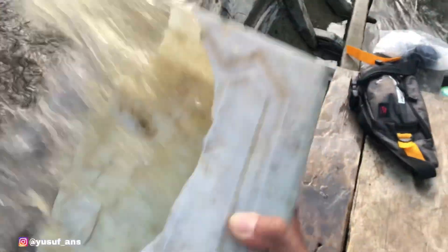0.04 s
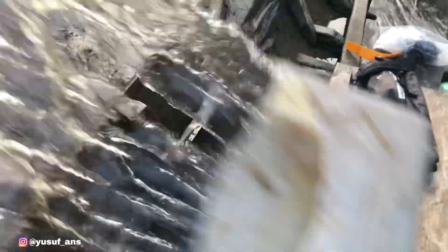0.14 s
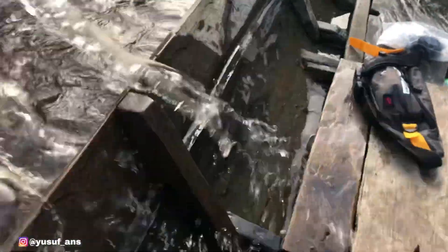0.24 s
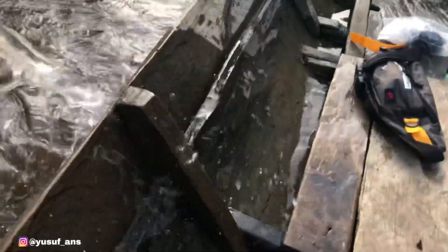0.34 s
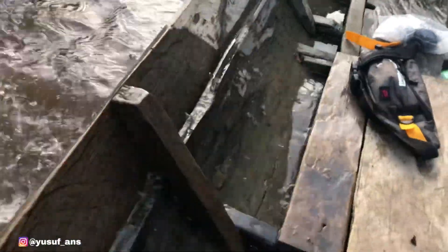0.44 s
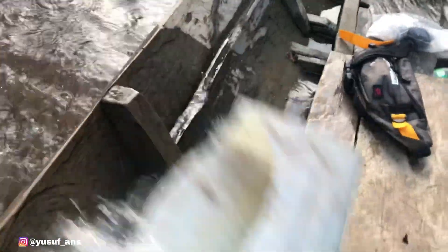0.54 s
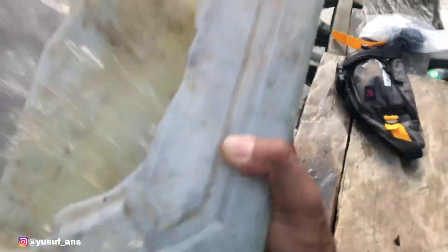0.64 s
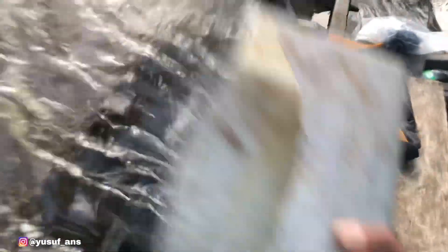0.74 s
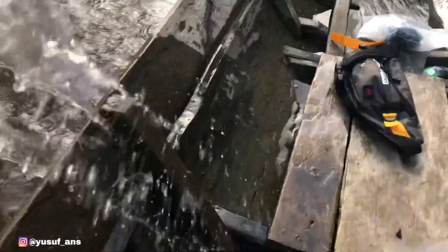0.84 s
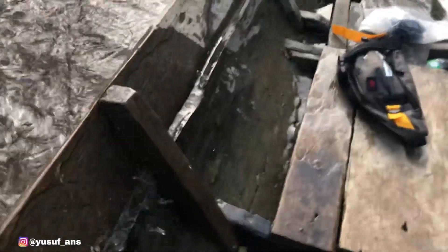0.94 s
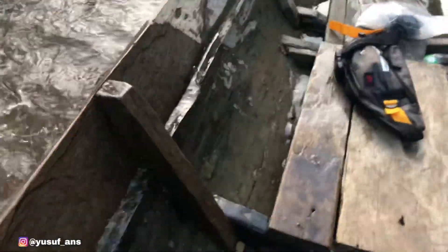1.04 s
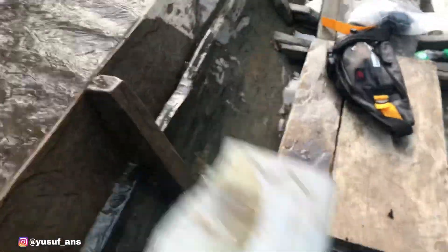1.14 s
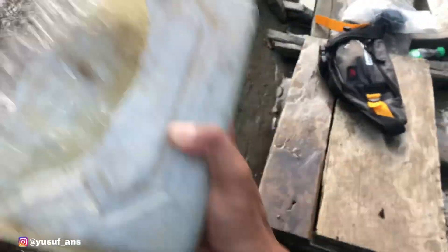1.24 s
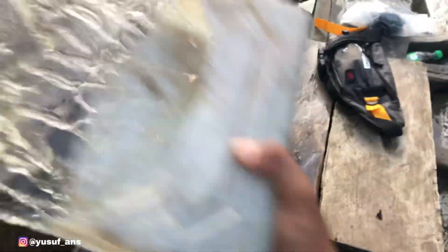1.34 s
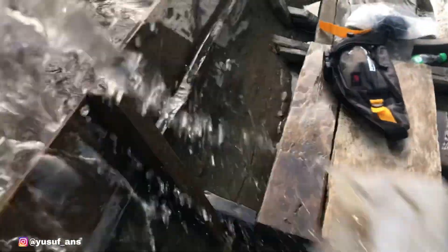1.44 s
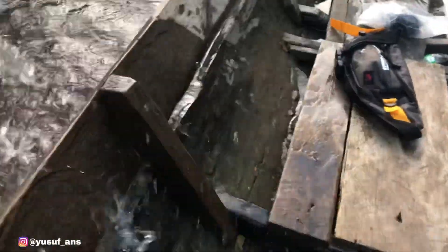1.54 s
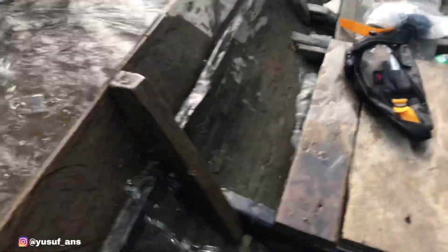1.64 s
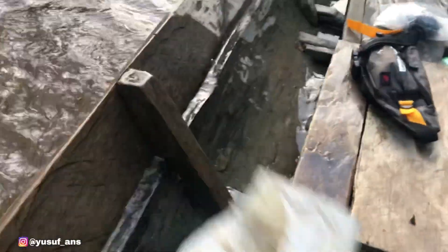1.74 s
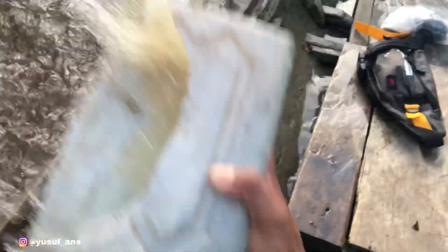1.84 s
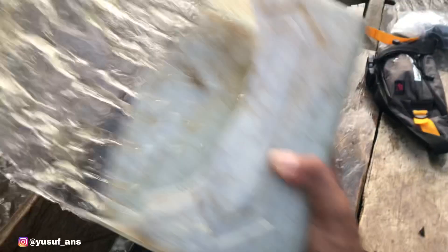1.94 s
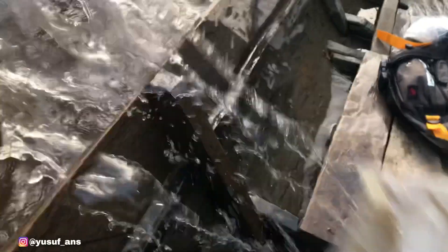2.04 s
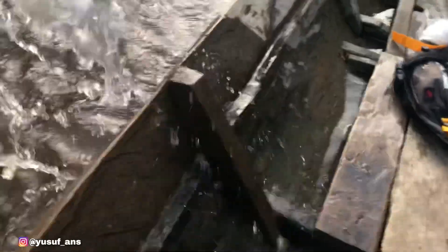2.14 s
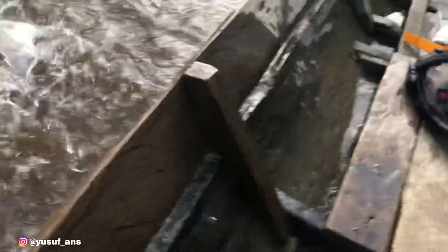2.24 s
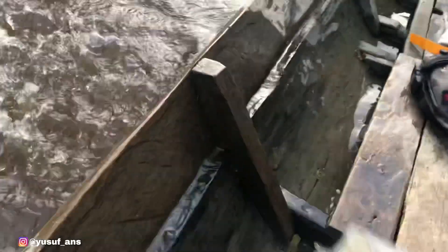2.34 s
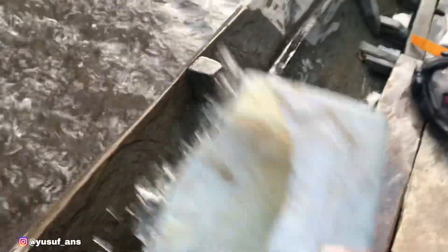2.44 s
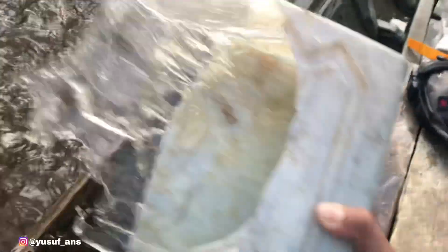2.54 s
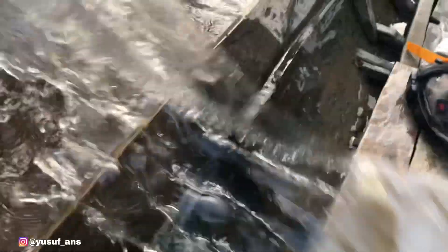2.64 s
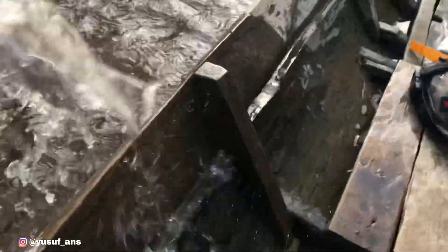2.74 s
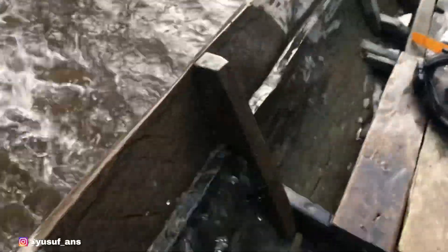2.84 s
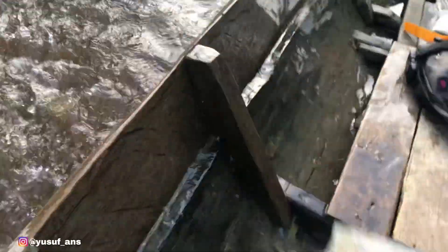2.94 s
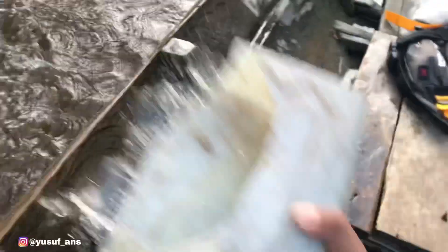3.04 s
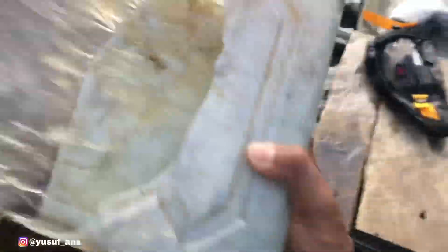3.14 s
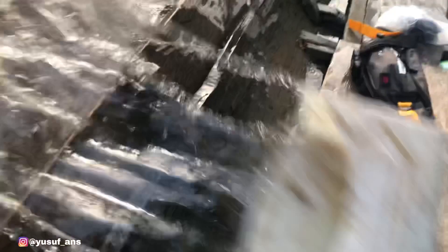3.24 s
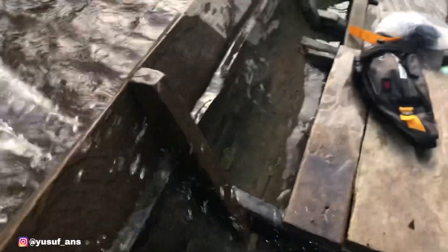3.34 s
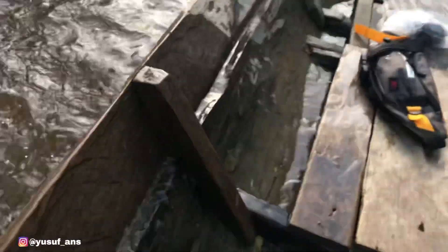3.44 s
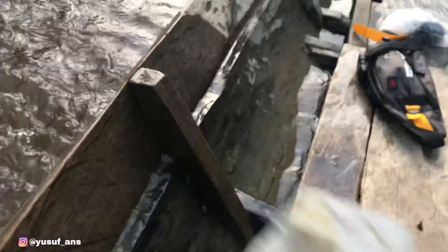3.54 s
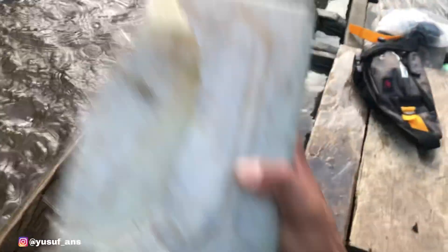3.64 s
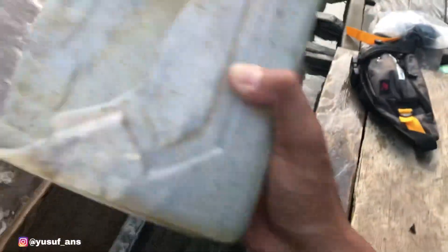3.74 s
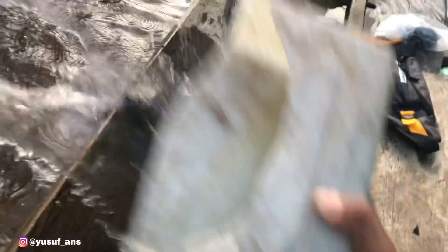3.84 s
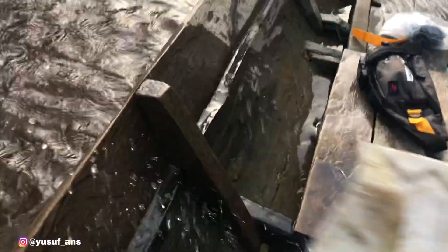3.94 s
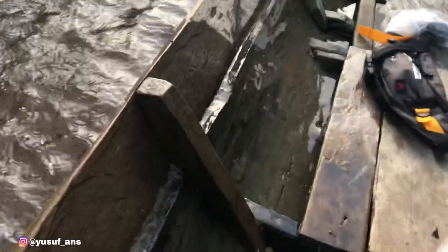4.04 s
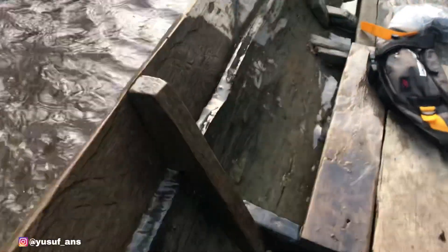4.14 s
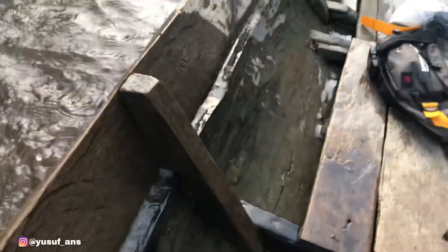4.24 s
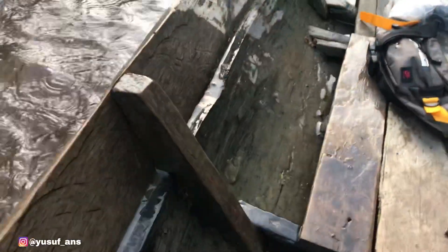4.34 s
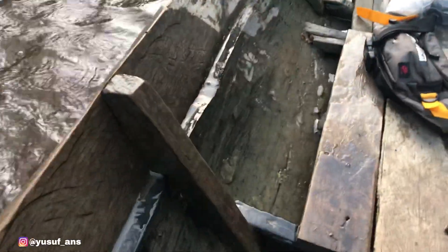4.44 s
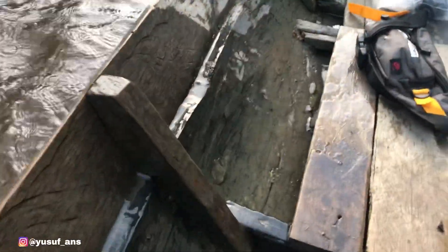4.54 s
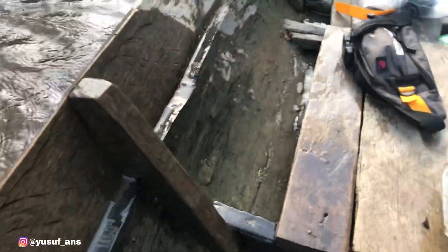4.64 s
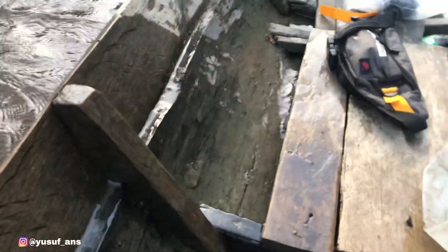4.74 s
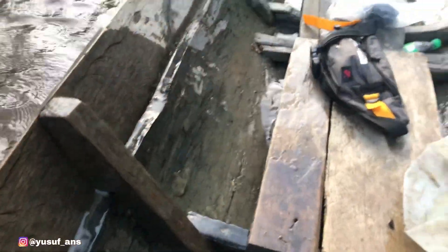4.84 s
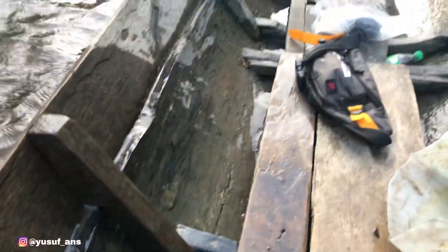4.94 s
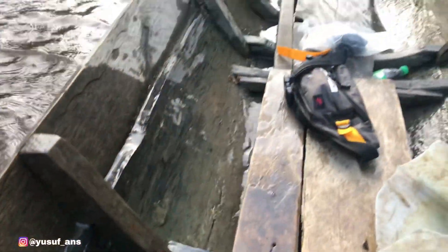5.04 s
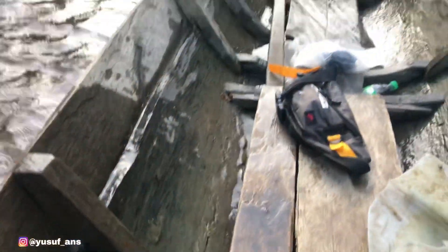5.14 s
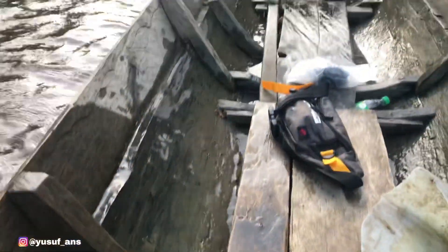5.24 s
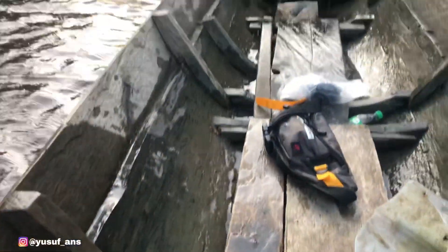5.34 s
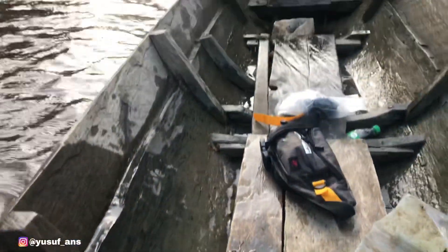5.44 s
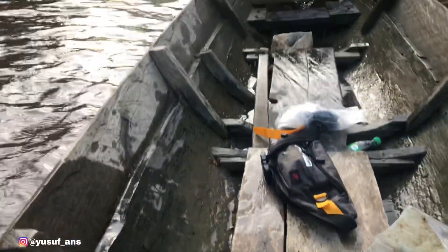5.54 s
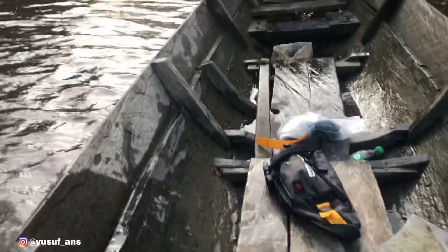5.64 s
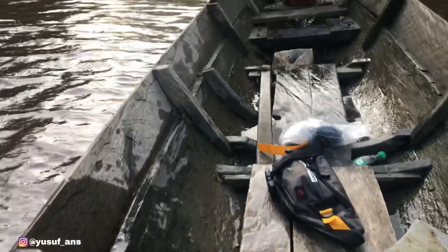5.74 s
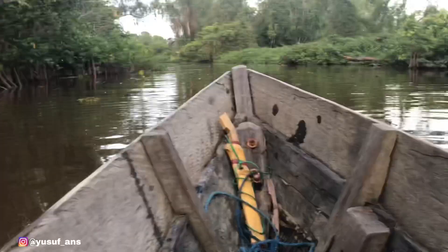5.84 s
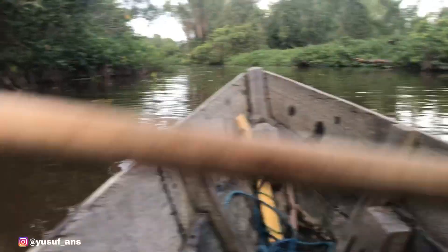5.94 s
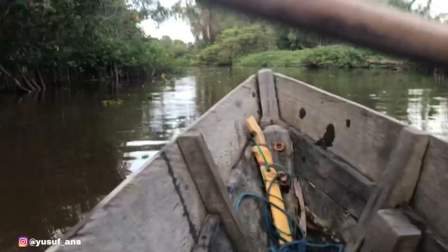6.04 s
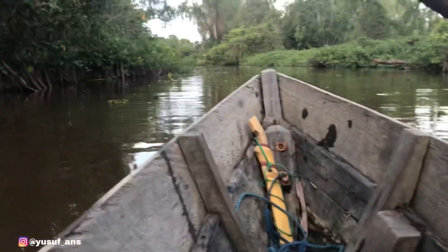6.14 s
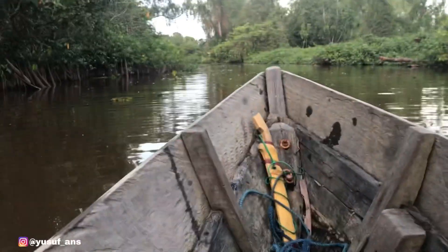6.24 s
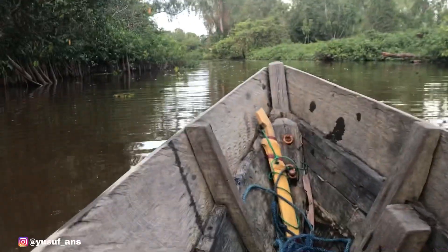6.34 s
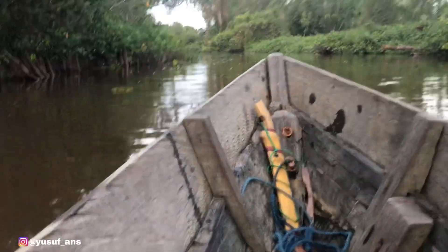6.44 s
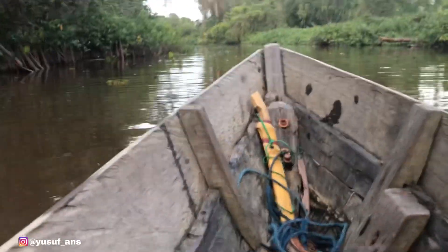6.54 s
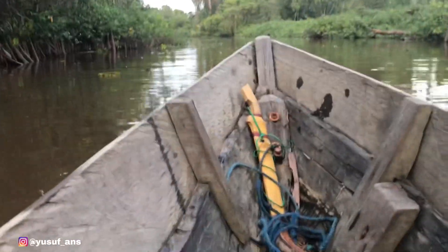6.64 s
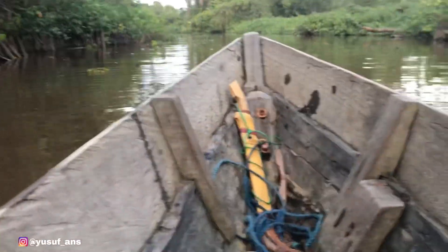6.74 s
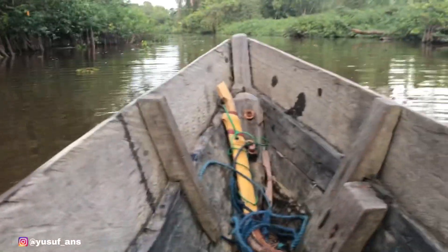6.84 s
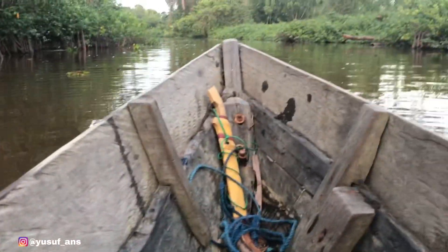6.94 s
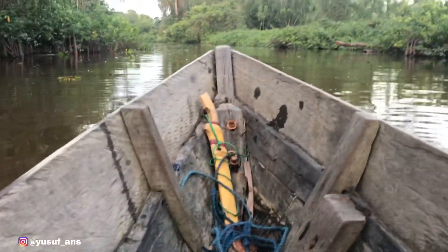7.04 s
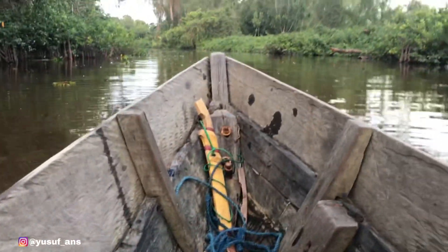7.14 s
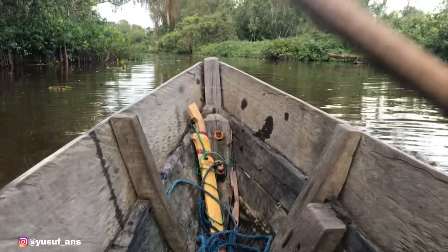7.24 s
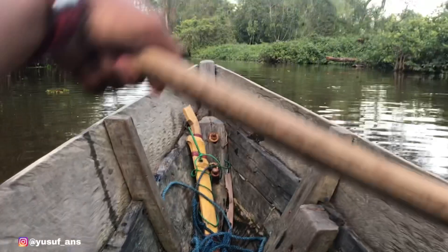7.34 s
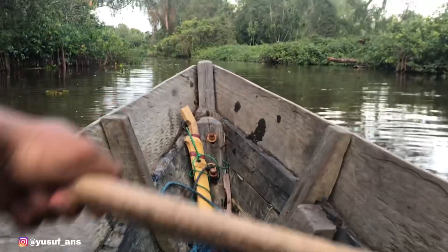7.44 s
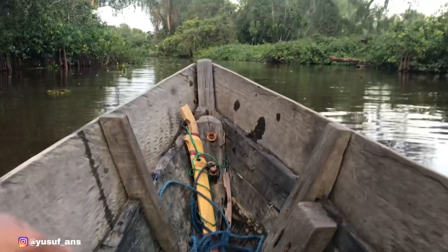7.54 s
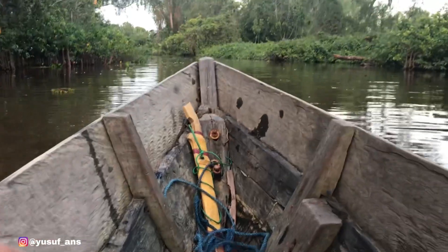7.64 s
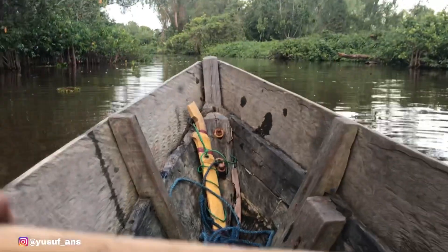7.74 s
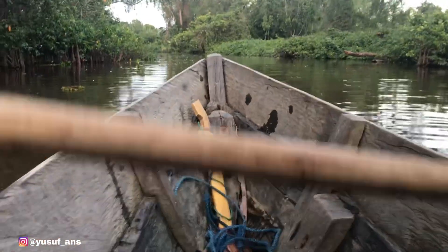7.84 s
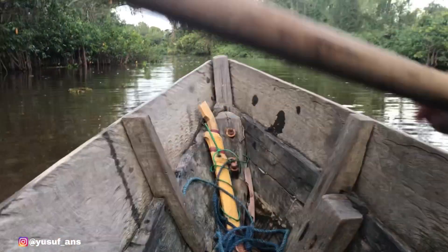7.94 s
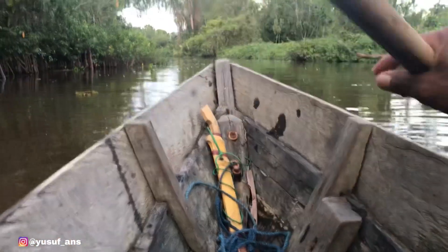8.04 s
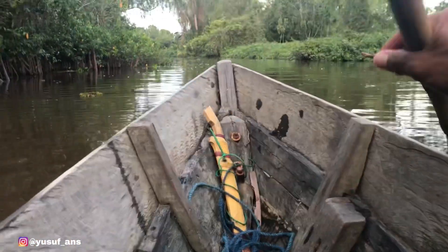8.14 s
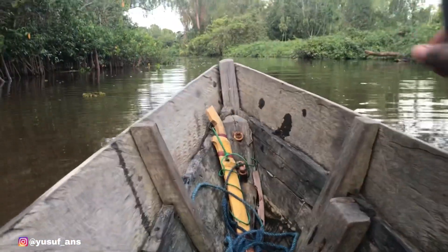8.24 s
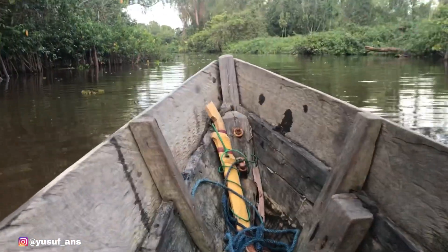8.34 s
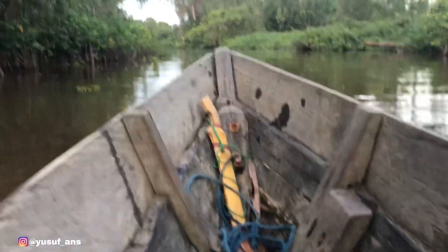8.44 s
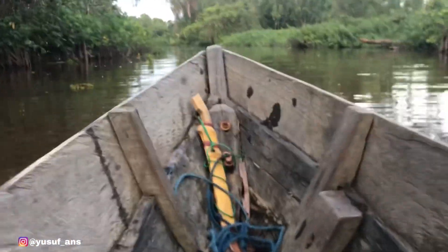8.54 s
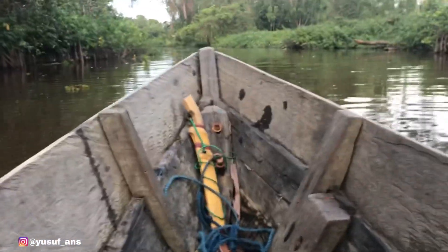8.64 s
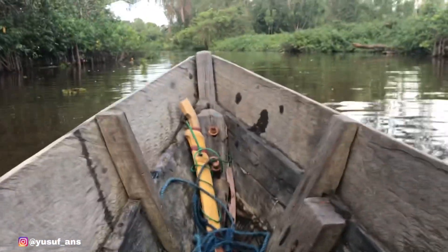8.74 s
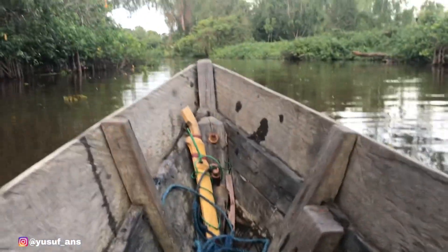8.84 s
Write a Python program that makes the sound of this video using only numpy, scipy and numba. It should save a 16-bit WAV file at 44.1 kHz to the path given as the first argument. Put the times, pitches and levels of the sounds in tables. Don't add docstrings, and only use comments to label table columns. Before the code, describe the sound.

Water splashes at once as bailing is already under way. At about 0.3, 0.9, 1.5, 2.2, 2.8 and 3.4 seconds a hard plastic scoop rasps over wooden planks, very loud and close, hollow and gritty with sharp snags, sometimes as a double scrape. After each comes a rush of spray, froth and slosh, with crackling drops and round bubble plops. The last stream thins to drips near 4.1. At 4.2 the empty scoop falls, knocks, slides and rattles to rest by 4.7, while a bird whistles upward. A small gust stirs leaves near 5. A distant engine thumps dully, with thin high insects. At 5.8 the ambience switches abruptly to the open river. From 6.4 a paddle bumps the hull, with soft wash, gulps around 7 to 7.3, flicked drops and faint chirps. More dull knocks and another pull follow from 8.1 to the end, much quieter than the bailing.

```python
import sys
import numpy as np
from scipy import signal
from scipy.fft import rfft, irfft, next_fast_len
from scipy.io import wavfile
from scipy.ndimage import uniform_filter1d, map_coordinates
from numba import njit

SR = 44100
rng = np.random.default_rng(int(sys.argv[2]) if len(sys.argv) > 2 else 0)


def generate_wav(sig):
    pcm = np.round(np.clip(np.atleast_2d(sig).T, -1, 1) * 32767).astype(np.int16)
    wavfile.write(sys.argv[1], SR, pcm)


def voltage_ratio(level):
    return 10 ** (np.asarray(level, float) / 20)


N = 391608
T = np.arange(N) / SR
BAILING, PADDLING = (0, 4.35), (6.45, 8.88)  # (start [s], end [s])
CHANGE_S = 5.8
TOP_HZ = 15850

# (start [s], end [s], start level [dB], end level [dB], mouth ring [dB])
SCRAPES = [(0.259, 0.309, -9.5, -3.5, -9), (0.361, 0.409, -4.5, -3, -0.5), (0.877, 1.003, -21, -11.5, 4),
           (0.999, 1.021, -2.5, -16.5, 8), (1.514, 1.559, -20.5, -12, 10), (1.56, 1.624, -13, -10.5, 4),
           (2.118, 2.145, 3, -8, -9), (2.179, 2.216, -18, -10, -8.5), (2.224, 2.24, 1, -5.5, -12.5),
           (2.742, 2.778, -1, -8, -5.5), (2.824, 2.875, -6.5, -3.5, -15.5), (3.36, 3.39, -6, -11.5, -12)]
DRAG_TUNING = [0.9, 0.57, -1.2, 0.8, 0.5, 0.2, 1.34, -0.6, 1.3, -.6, 0.02, 2.5]
# (frequency [Hz], width [Hz], level
# [dB])
SCOOP_MODES = [(81, 26, -15.5), (157, 49, -11.5), (264.4, 33, -4.5), (332.2, 26, 1), (455.3, 71, 0.5),
               (551.4, 51, 0), (644, 69, -2), (753, 60, -6.5)]
# (frequency [Hz], width [Hz], level [dB])
MOUTH_MODES = [(954, 74, 0), (1060, 100, -7.5), (1270, 66, -14.5), (1450, 48, -13.5), (1628, 120, -13),
               (2100, 115, -15), (2730, 140, -19.5), (3280, 100, -21), (3580, 100, -17), (3980, 120, -22.5)]
# (frequency [Hz], density [dB per Hz])
GRIT_COLOUR = [(650, -27.5), (1100, -2), (2510, -8), (3140, -4), (4960, -13.5), (7400, -21), (9250, -21),
               (15800, -28.5)]
# (time [s], peak level [dB])
CATCHES = [(0.259, 8.5), (0.274, -4), (0.301, -1.5), (0.362, -1), (0.373, 2), (0.396, 2.5), (0.878, -0.5),
           (0.908, -3.5), (0.95, -9), (0.971, -5), (0.993, 3), (1.014, -5), (1.503, 2.5), (1.529, -3),
           (1.546, -5), (1.565, -5), (1.588, 0.5), (1.617, -2), (2.118, 7.5), (2.14, 7), (2.183, -5),
           (2.207, -1), (2.226, 2.5), (2.247, 4.5), (2.745, -2), (2.762, 2.5), (2.829, 0), (2.849, 2.5),
           (2.864, 14), (3.36, 3.5), (3.375, -9.5), (3.387, -4)]
# (start [s], end [s], start level [dB], end level [dB])
SLIDES = [
    (4.245, 4.379, -28.5, -13.5),
    (4.374, 4.51, -24, -19),
    (4.499, 4.68, -19, -40),
]
# (time [s], peak level [dB], click level [dB], shift [semitones])
TUMBLE = [(4.237, -21.5, -7.5, .3), (4.242, -6, -21, -0.88), (4.285, -20, -20, .3),
          (4.362, -7.5, -17.5, -0.13), (4.401, -18, -4.5, 0.16), (4.414, -16.5, -5, .3),
          (4.441, -15.5, -10, .3), (4.462, -15.5, -3.5, .3), (4.477, -14.5, -14.5, 0.2),
          (4.487, -8, -16, 0.75), (4.521, -24.5, -9.5, 0.45), (4.531, -13, -15.5, 0.41),
          (4.583, -24.5, -16.5, .6), (4.639, -27.5, -13.5, 0.45)]
# (frequency [Hz], width [Hz], level [dB])
EMPTY_MODES = [(181, 32, -9), (273, 27, -4.5), (339.7, 55, -1.5), (457, 48, -6.5), (622, 55, -8),
               (776, 90, -12), (960, 38, -1), (1060, 95, -6), (1340, 170, -13), (1626, 100, -13),
               (2030, 140, -19.5), (2900, 300, -26.5)]

# (peak time [s], level [dB], rise [s], hold [s])
GUSHES = [(0, -34.5, .05, .04), (.235, -42.5, .03, .02), (.26, -33.5, 0.035, .1), (.44, -30.5, 0.19, .05),
          (.62, -33, 0.45, 0.05), (.84, -41, .02, .03), (1.05, -32, 0.4, 0.11), (1.27, -32.5, 0.24, .01),
          (1.42, -44.5, .05, .06), (1.66, -28.5, 0.38, 0.19), (1.9, -39.5, 0.14, .05), (2.3, -31, 0.41, .2),
          (2.63, -46, 0.068, .1), (2.91, -30.5, 0.48, .03), (3.02, -42, .1, .13), (3.41, -31, 0.068, 0.082),
          (3.6, -31.5, .3, 0.048)]
# (peak time [s], level [dB], rise [s], hold [s])
TRICKLE = [
    (4.063, -38, 0.044, .14),
]
# (frequency [Hz], density [dB per Hz])
SPRAY_COLOUR = [(880, -34), (1500, -7.5), (1810, 1), (2870, -6), (4520, -2), (7620, -9.5), (9470, -5.5),
                (14900, -9), (15800, -13)]
# (frequency [Hz], density [dB per Hz])
FROTH_COLOUR = [(500, -27), (850, 0), (1100, 3.5), (2200, -10.5), (3500, -11.5)]
# (frequency [Hz], density [dB per Hz])
SLOSH_COLOUR = [(150, -12.5), (250, -2), (450, -3), (700, -9.5), (1000, -15)]
# (time [s], peak level [dB], pitch [Hz])
BAIL_DROPS = [(0.0145, -12, 4700), (.064, -21, 4100), (.078, -18, 3700), (.174, -26.5, 11000),
              (0.1827, -12.5, 9200), (0.234, -17.5, 3700), (0.519, -12, 2600), (0.6193, -7.5, 2500),
              (0.829, -18.5, 3820), (0.994, 0, 3100), (1.2717, -13, 3720), (1.448, -18, 3450),
              (1.8346, -6, 4030), (1.9211, -15.5, 2610), (2.085, -15.5, 3700), (2.2885, -8, 3800),
              (2.379, -14, 3940), (2.46, -15.5, 4500), (2.6772, -17, 4300), (2.687, -18, 4300),
              (2.645, -21.5, 3320), (3.495, -12.5, 4500), (3.462, -18, 4000), (.792, -28.5, 4690),
              (.861, -23.5, 5000), (1.151, -17, 4420), (3.577, -15, 5200), (2.864, -2.5, 2960),
              (3.135, -13, 4280), (3.1936, -19.5, 3600), (3.311, -18.5, 3980), (3.6301, -15.5, 2900)]
# (time [s], peak level [dB], pitch [Hz])
DRIPS = [(3.787, -24.5, 3300), (3.874, -29, 4230), (3.886, -23, 2500), (3.979, -20.5, 7400),
         (3.99, -20.5, 2900), (4.0435, -24, 4570), (4.0801, -12, 3820), (4.1112, -15, 8650),
         (4.15, -18, 4300), (4.7888, -36.5, 8290), (5.0395, -32.5, 8400), (5.4343, -33, 8030),
         (5.472, -40.5, 2600), (5.729, -47, 2500), (6.5985, -31.5, 5610), (7.268, -37, 8090),
         (7.646, -31.5, 5140), (8.1753, -41.5, 4000), (8.488, -28.5, 4220), (8.8422, -35.5, 3640)]
# (time [s], peak level [dB], pitch [Hz])
PLANK_SPITS = [(0.4299, -13.5, 3630), (0.4843, -15, 5900), (0.5621, -10.5, 3970), (0.61, -14, 4040),
               (0.6694, -24, 3880), (0.7148, -20, 4300), (0.7774, -31.5, 3360), (0.8096, -22, 8580),
               (0.8444, -16, 6130), (1.035, -14, 8550), (1.0774, -17.5, 4490), (1.0969, -10.5, 3070),
               (1.1423, -15.5, 4280), (1.2999, -12.5, 4240), (1.3962, -21.5, 3070), (1.7255, -15, 3080),
               (1.7964, -18.5, 3080), (1.8284, -10.5, 3760), (1.8514, -15.5, 10900), (1.8664, -19, 3700),
               (1.8946, -18.5, 5720), (1.9334, -23.5, 4070), (2.0148, -22, 3390), (2.0344, -25.5, 9660),
               (2.0398, -16.5, 11830), (2.0544, -23, 5800), (2.0612, -21.5, 6600), (2.0724, -10, 9600),
               (2.2558, -5.5, 3990), (2.4404, -16.5, 4540), (2.613, -13, 6490), (2.6964, -19, 13520),
               (2.7334, -10, 3144), (2.8055, -6.5, 4450), (2.9118, -14.5, 3030), (3.3353, -16, 3490),
               (3.4077, -3.5, 4450), (3.6566, -14, 6110)]
# (time [s], peak level [dB], pitch [Hz])
BLADE_FLICKS = [(7.2541, -40, 3220), (7.2671, -36, 8090), (7.3155, -43, 8130), (7.3513, -37, 8250),
                (7.4038, -40, 8100), (7.4733, -38, 8140), (7.516, -34, 8030), (7.5978, -40, 3720),
                (7.6203, -37, 3030), (7.6458, -35, 5180), (7.6901, -31, 8490), (7.719, -39, 8060),
                (7.748, -39, 8080), (7.7924, -43, 8110)]
# (time [s], peak level [dB], pitch [Hz])
PLOPS = [(0.042, -23, 810), (0.061, -9.5, 872), (0.469, -16, 840), (0.517, -13, 2030), (0.539, -18, 554),
         (0.638, -15, 1056), (0.695, -14.5, 1730), (1.245, -13, 2160), (1.274, 11.5, 1730),
         (1.686, -14, 1060), (1.762, -8, 673), (1.829, -14.5, 1060), (1.893, -13.5, 930),
         (1.905, -17.5, 1600), (1.922, -14, 2670), (2.42, -15.5, 1790), (2.471, -18, 1170),
         (3.483, -13.5, 2190), (3.793, -25.5, 990), (4.182, -23.5, 1980), (4.199, -27, 1470),
         (5.365, -43, 1426), (5.472, -38, 1450), (5.883, -45.5, 1205), (7.244, -26, 710), (7.284, -14, 627),
         (7.328, -32, 537),
         (.402, -3, 1600), (.437, -17, 1650), (.483, -19, 1900), (1.634, -14, 2100), (1.657, -18, 1680),
         (2.024, -27, 1780), (2.339, -28, 1050), (2.52, -21, 1250), (2.604, -24.5, 1900), (.579, -24, 1300),
         (2.872, -4, 1600), (2.982, -17, 1790), (3.017, -27, 1100), (3.093, -20.5, 2130),
         (3.458, -20, 1410), (3.488, -18, 1050), (3.527, -17, 1750), (3.597, -15.5, 2150), (3.61, -18, 965),
         (7.243, -39, 1800), (7.254, -41, 3100), (7.328, -33, 1080), (7.013, -38, 850), (7.045, -36, 1400),
         (7.485, -31, 1000), (7.75, -40, 1910)]
# (time [s], pitch [Hz], level [dB])
RISING = [
    [(3.172, 1124, -37), (3.2, 1450, -39), (3.215, 1750, -46)],
    [(3.208, 904, -37), (3.24, 964, -43), (3.27, 2100, -51)],
]

# (time [s], peak level [dB], click level [dB])
KNOCKS = [(6.399, -49, 9.5), (6.495, -13, -28), (6.725, -22, -35), (8.138, -10, -31), (8.269, -21, -17.5),
          (8.323, -25.5, -24), (8.571, -21.5, -33.5), (8.799, -21, -31), (8.839, -13, -30),
          (8.871, -18, -25)]
# (frequency [Hz], width [Hz], level [dB])
HULL_MODES = [(217, 32, 4.5), (355, 27, 1), (433, 32, -2), (631, 67, -2)]
# (start [s], end [s], spray level [dB], bubble level [dB], slosh level [dB])
PULLS = [
    (6.482, 7.767, -62.5, -52.5, -50),
    (8.27, 9, -58.5, -60.5, -46.5),
]
# (peak time [s], level [dB], rise [s], hold [s])
SWISHES = [(6.55, -54.5, 0.092, 0.2), (6.87, -50.5, 0.7, 0.24), (7.66, -52, 0.55, 0.05),
           (8.33, -56, .015, 0.22), (8.48, -48.5, 0.31, 0.22)]
# (peak time [s], level [dB], rise [s], hold [s])
GULPS = [(6.52, -55, .05, .2), (6.95, -43, 0.85, .2), (7.28, -42, 0.13, 0.046),
         (8.272, -39.5, 0.0093, 0.021), (8.86, -31.5, 0.23, .1)]
# (frequency [Hz], density [dB per Hz])
WASH_COLOUR = [(880, -27), (1500, -4), (3570, -4), (5840, -5), (8330, -9), (10700, -15.5), (15800, -14)]

# (time [s], firings so far [count])
FIRINGS = [(0, -83.5), (4.7681, -16), (5.7559, -2), (5.8767, 0), (7.7963, 27), (8.9, 42.52)]
# (frequency [Hz], density [dB per Hz])
RUMBLE_COLOUR = [(12, -54.5), (20, -38), (86, -1.5), (208, -17), (228, -20), (278, -16.5), (400, -36),
                 (520, -66), (880, -120)]
# (peak time [s], level [dB], rise [s], hold [s])
TRILL_SONG = [(5.3, -54, 0.67, 0.02), (5.78, -62, .6, 0.0093)]
# (peak time [s], level [dB], rise [s], hold [s])
UPPER_SONG = [(4.8, -55, 0.19, 0.77)]
# (time [s], pitch [Hz], level [dB])
BIRDS = [
    [(4.18, 3100, -48), (4.21, 3030, -48), (4.27, 3560, -39), (4.36, 4270, -35), (4.385, 4300, -42),
     (4.6, 4320, -55.5), (4.78, 4260, -60)],
    [(5.12, 7130, -62.5), (5.42, 7020, -67)],
    [(5.5, 6440, -63), (5.68, 6700, -63.5), (5.8, 6700, -63)],
]
# (time [s], pitch [Hz], level [dB])
CHIRP = [(0, 4970, -6), (.012, 5700, -6), (.023, 6230, -3), (.035, 6000, -4)]
# (time [s], level [dB])
CHIRPS = [(6.501, -40), (6.683, -43), (6.909, -45)]
# (frequency [Hz], density [dB per Hz])
AIR_COLOUR = [(250, -9), (330, 0.5), (600, -3.5), (1500, -7.5), (4700, -12.5), (9000, -13.5),
              (15800, -17.5)]


def scraping():
    slips = unit(voltage_ratio(3.3 * wobble(90)))
    force = slips * hiss([(20, 0.00062), (8000, 0.0095)], patchy_db=2)
    force = force / np.std(filtered(force, body(SCOOP_MODES)))
    shell, grit, mouth = np.zeros((3, N))
    for (start, end, db0, db1, mouth_db), semitones in zip(SCRAPES, DRAG_TUNING):
        begun, dragging = T >= start, (T >= start) & (T < end)
        level = voltage_ratio(np.interp(T, [start, end], [db0, db1])) * begun
        answer = rung((level * force)[dragging], SCOOP_MODES, semitones, scatter_db=1.5)
        shell[round(start * SR):][:len(answer)] += answer
        mouth += level * (T < end) * voltage_ratio(mouth_db)
        settling = voltage_ratio(-16.5 - 60 * np.maximum(T - end, 0) / 0.093)
        grit += level ** 0.4 * begun * settling
    slide = sum(voltage_ratio(np.interp(T, row[:2], row[2:])) * during(*row[:2]) for row in SLIDES)
    dry_modes = SCOOP_MODES[:5] + [(962, 60, -9.5)]
    wet = swarm(BAILING, count=2000, centre_hz=2600, octaves=.6, cycles=29, spread_db=1.5)
    crushed = .7 * hiss(GRIT_COLOUR, patchy_db=1.5) + .7 * wet
    scrape = shell + filtered(mouth * force, body(MOUTH_MODES)) + filtered(slide * force, body(dry_modes))
    return voltage_ratio(-4.0) * (scrape + grit * unit(slips * voltage_ratio(1.7 * wobble(300)) * crushed))


def rim_catches():
    s, db = np.transpose(CATCHES)
    rested = np.diff(s, prepend=0) > .05
    click_db = -10.5 - .63 * db + 4.5 * rested
    tune = np.interp(s, [row[0] for row in SCRAPES], DRAG_TUNING)
    return blows(zip(s, db, click_db, tune), SCOOP_MODES, MOUTH_MODES, push_s=0.00029,
                 thud_db=7.5, click_db=0, rough_db=12.0, scatter_db=1.5)


def dropped_scoop():
    return blows(TUMBLE, EMPTY_MODES[:6], EMPTY_MODES[6:], push_s=0.00034,
                 thud_db=17.5, click_db=1.5, rough_db=13.5, scatter_db=2.5)


def bailed_water():
    froth_db, slosh_db = -3, -12.5
    dribble = voltage_ratio(-2 * 31 * np.maximum(T - 4.5, 0))
    gush = swells(GUSHES, dies=110)
    froth = level_db(voltage_ratio(2 * froth_db) * gush + voltage_ratio(2 * -55) * dribble)
    spray = level_db(swells(GUSHES + TRICKLE, dies=180) + voltage_ratio(2 * -51) * dribble)
    return water(BAILING, spray, froth, froth + slosh_db - froth_db, SPRAY_COLOUR,
                 clump_db=2.5, crackle=0.8, foam=0.72, patchy_db=3.5)


def bursting_drops():
    s, db, hz = np.transpose(BAIL_DROPS + DRIPS).copy()
    crack = np.bincount((s * SR).astype(int), voltage_ratio(db - 8.0), N)
    crack = np.convolve(crack, voltage_ratio(-60 * T[:SR // 50] / 0.0057))[:N] * hiss(SPRAY_COLOUR)
    return crack + drops(s, voltage_ratio(db - 2), hz, np.full(len(s), .011), rise=0.061)


def spits():
    s, db, hz = np.transpose(PLANK_SPITS + BLADE_FLICKS).copy()
    ticks = np.zeros(N)
    for ratio in (.8, 1.02, 1.3):
        size = voltage_ratio(db - 6.5 + rng.normal(0, 1.5, len(s)))
        t60 = 16 / hz / ratio + 0.0013
        ticks += drops(s, size, np.clip(hz * ratio, 500, TOP_HZ), t60, rise=.05)
    crack = np.bincount((s * SR).astype(int), voltage_ratio(db - 5.0), N)
    crack = np.convolve(crack, voltage_ratio(-60 * T[:SR // 100] / 0.005))[:N]
    return ticks + crack * hiss([(3000, -12.5), (6000, -2), (15800, -2.5)], patchy_db=6.0)


def bubbles():
    s, db, hz = np.transpose(PLOPS).copy()
    t60 = 0.048 / (1 + voltage_ratio(db + 7))
    climbing = sum(glide(bubble, flutter_db=2.2, waver=0.0033) for bubble in RISING)
    return climbing + drops(s, voltage_ratio(db - 2.0), hz, np.clip(t60, .003, .12), rise=0.1)


def paddle_knocks():
    return blows([(*row, 0) for row in KNOCKS], HULL_MODES[:2], HULL_MODES[2:], push_s=0.00036,
                 thud_db=8.5, click_db=1.5, rough_db=-6, scatter_db=1.2)


def paddled_water():
    swishes = swells(SWISHES, dies=69, sag=17)
    gulps = swells(GULPS, dies=220, sag=8.8)
    drift_db = np.array((-68, -70.5, -64))
    wash = np.outer(voltage_ratio(2 * drift_db), T > CHANGE_S)
    pulling = np.zeros(N)
    for start, end, *levels_db in PULLS:
        pull = during(start, end)
        pulling += pull
        wash += np.outer(voltage_ratio(2 * np.array(levels_db)), pull)
    gulps = gulps * pulling
    swish_foam = voltage_ratio(-1.5) * swishes * (T > SWISHES[1][0] + .5)
    spray, froth, slosh = wash + [swishes * pulling, voltage_ratio(-33) * gulps + swish_foam, gulps]
    return water(PADDLING, level_db(spray), level_db(froth), level_db(slosh), WASH_COLOUR,
                 clump_db=1.1, crackle=0.0603, foam=0.9, patchy_db=2.15)


def engine():
    thump_db, hz = by_scene((-38.5, -29), late_s=.045), by_scene((104.8, 158))
    rumble_db = by_scene((-46, -48.5)) + 1.5 * wobble(6.7)
    turn = curves(FIRINGS)[0]
    firing = np.round(turn)
    lag = (turn - firing) / np.gradient(turn) / SR * hz
    size = voltage_ratio(rng.normal(0, 3.4, 200))[firing.astype(int)]
    thump = -voltage_ratio(thump_db) * size * np.cos(2 * np.pi * lag - .25) * np.exp(-(lag / .62) ** 2)
    t = T[:SR // 10]
    banks = rng.standard_normal(len(t)) * voltage_ratio(-60 * t / 0.081) * (t > .02)
    echo = signal.fftconvolve(thump, banks / np.linalg.norm(banks))[:N]
    return thump + voltage_ratio(-8.5) * echo + voltage_ratio(rumble_db) * hiss(RUMBLE_COLOUR)


def insects():
    trill = voltage_ratio(2 * by_scene((-61, -65.5))) + swells(TRILL_SONG, dies=330, sag=1)
    upper = voltage_ratio(2 * by_scene((-59, -72))) + swells(UPPER_SONG, dies=300, sag=3.6)
    pulses = (1 + np.sin(2 * np.pi * 43.5 * T)) ** 2 * (1 + .7 * np.sin(2 * np.pi * 14.5 * T))
    middle = voltage_ratio(level_db(trill)) * unit(pulses) * insect_band(8290, 260)
    high = voltage_ratio(level_db(upper)) * insect_band(8540, 170)
    return middle + high + voltage_ratio(by_scene((-56.5, -59.5))) * insect_band(8030, 220)


def insect_band(hz, width):
    wings = filtered(rng.standard_normal(N), lambda f: body([(hz, width, 0)])(f) ** 2)
    return unit(voltage_ratio(1.5 * wobble(30)) * wings)


def birds():
    chirps = [[(s + lag, hz, db + rel_db) for lag, hz, rel_db in CHIRP] for s, db in CHIRPS]
    return sum(glide(note, flutter_db=4, waver=0.018) for note in BIRDS + chirps)


def air():
    start, end = 4.72, 5.17
    level = voltage_ratio(by_scene((-57.5, -66)) + 4.8 * during(start, end))
    leaves = voltage_ratio(-51) * during(start, end, edge_s=0.045) * hiss(WASH_COLOUR, patchy_db=4.5)
    return level * hiss(AIR_COLOUR, patchy_db=2.5) + leaves


def water(span, spray_db, froth_db, slosh_db, spectrum, clump_db, crackle, foam, patchy_db):
    clump = voltage_ratio(clump_db * wobble(45))
    fine = swarm(span, count=6000, centre_hz=4850, octaves=0.7, cycles=11, spread_db=3.2)
    small = swarm(span, count=1500, centre_hz=1377, octaves=.55, cycles=27, spread_db=2.0)
    large = swarm(span, count=300, centre_hz=435.0, octaves=.45, cycles=27, spread_db=1.5)
    spray = hiss(spectrum, patchy_db) + crackle * fine
    froth = foam * hiss(FROTH_COLOUR, patchy_db=4.5) + small
    slosh = foam * hiss(SLOSH_COLOUR, patchy_db=6.5) + large
    fizz, heave = voltage_ratio(1.5 * wobble(150)), voltage_ratio(2.5 * wobble(25))
    spray = voltage_ratio(spray_db + 3.5) * unit(clump * fizz * spray)
    froth = voltage_ratio(froth_db) * unit(clump * voltage_ratio(2.2 * wobble(12)) * froth)
    return spray + froth + voltage_ratio(slosh_db) * unit(heave * slosh)


def blows(rows, shell, fixed_modes, push_s, thud_db, click_db, rough_db, scatter_db):
    ring, crack = np.zeros((2, N + SR))
    t = np.arange(SR // 30) / SR
    for s, db, rel_db, semitones in rows:
        rough = voltage_ratio(rel_db + rough_db - 60 * t / 0.064) * rng.standard_normal(len(t))
        force = voltage_ratio(db + thud_db) * (t / push_s * np.exp(1 - t / push_s) + rough)
        answer = rung(force, shell, semitones, scatter_db) + rung(force, fixed_modes, 0, scatter_db / 2)
        ring[round(s * SR):][:len(answer)] += answer
        crack[round(s * SR):][:len(t)] += voltage_ratio(db + rel_db + click_db - 60 * t / 0.028)
    return ring[:N] + crack[:N] * hiss(GRIT_COLOUR, patchy_db=4.0)


def rung(force, modes, semitones, scatter_db):
    m = 2 ** 14
    hz, width, db = np.transpose(modes)
    modes = zip(hz * 2 ** (semitones / 12), width, db + scatter_db * rng.standard_normal(len(db)))
    return irfft(rfft(force, m) * body(modes)(np.fft.rfftfreq(m, 1 / SR)), m)


def body(modes):
    def response(f):
        total = 0
        for k, (hz, width, db) in enumerate(modes):
            total = total + (-1) ** k * voltage_ratio(db) * 1j * f * width / (hz * hz - f * f + 1j * f * width)
        return total
    return response


@njit
def drops(s, size, hz, t60, rise):
    out = np.zeros(N + SR)
    for k in range(len(s)):
        for j in range(int(SR * t60[k])):
            t = j / SR
            u = t / t60[k]
            swell = np.exp(-np.log(1000) * u) * (1 - np.exp(-t * hz[k]))
            out[int(s[k] * SR) + j] += size[k] * np.sin(2 * np.pi * hz[k] * t * (1 + rise * u)) * swell
    return out[:N]


def swarm(span, count, centre_hz, octaves, cycles, spread_db):
    s, e = rng.random((2, count))
    hz = centre_hz * 2 ** (octaves * rng.standard_normal(count))
    hz = np.clip(hz, centre_hz / 2, 15000)
    start, end = span
    size = voltage_ratio(-spread_db * np.log(e + 0.0018))
    popping = drops(start + s * (end - start), size, hz, cycles / hz, rise=0.22)
    return unit(popping) * np.sqrt((end - start) * SR / N)


def glide(note, flutter_db, waver):
    hz, db = curves(note)
    edges = np.clip(np.minimum(T - note[0][0], note[-1][0] - T) / 0.004, 0, 1)
    on = edges > 0
    level = voltage_ratio((db + flutter_db * wobble(120))[on]) * edges[on]
    phase = 2 * np.pi * np.cumsum((hz * (1 + waver * wobble(300)))[on]) / SR
    out = np.zeros(N)
    out[on] = level * np.sin(phase)
    return out


def hiss(spectrum, patchy_db=0):
    z = signal.stft(rng.standard_normal(N), nperseg=256)[2]
    field = uniform_filter1d(rng.standard_normal(z.shape), size=4, axis=0)
    field = uniform_filter1d(field, size=6, axis=1)
    white = signal.istft(z * voltage_ratio(patchy_db * unit(field)), nperseg=256)[1][:N]
    f, db = np.transpose(spectrum)
    return unit(filtered(white, lambda hz: voltage_ratio(np.interp(np.log(hz + 1), np.log(f), db, -120, -120))))


def filtered(x, response):
    m = next_fast_len(N + SR // 2)
    return irfft(rfft(x, m) * response(np.fft.rfftfreq(m, 1 / SR)), m)[:N]


def swells(rows, dies, sag=30.5):
    t = T[::32, None]
    s, top, rise, hold = np.transpose(rows)
    db = top - 22 * np.maximum(s - t, 0) / rise
    db = db - sag * np.maximum(t - s, 0) - dies * np.maximum(t - s - hold, 0)
    return np.interp(T, t[:, 0], voltage_ratio(2 * db).sum(axis=1))


def by_scene(pair, late_s=0):
    return np.interp(T - late_s, [CHANGE_S - .015, CHANGE_S + 0.025], pair)


def during(start, end, edge_s=0.0053):
    return np.clip(np.minimum(T - start, end - T) / edge_s + .5, 0, 1)


def wobble(rate):
    t = T[::8]
    knots = rng.standard_normal(int(N * rate / SR) + 4)
    return np.interp(T, t, map_coordinates(knots, [t * rate]))


def curves(rows):
    s, *cols = np.transpose(rows)
    return [np.interp(T, s, c) for c in cols]


def level_db(power):
    return 10 * np.log10(power + 1e-12)


def unit(x):
    return x / np.sqrt(np.mean(x ** 2) + 1e-20)


def scene():
    bailing = scraping() + rim_catches() + dropped_scoop() + bailed_water()
    droplets = bursting_drops() + spits() + bubbles()
    paddling = paddle_knocks() + paddled_water()
    background = engine() + insects() + birds() + air()
    return (bailing + droplets + paddling + background)[None]


def low_pass(x):
    return signal.sosfilt(signal.butter(12, 16490, fs=SR, output="sos"), x)


def record(dry):
    heard = filtered(dry[0], lambda f: (f < TOP_HZ) * (1j * f / (1j * f + 28)) ** 2)[None]
    mix = heard / (1 + np.abs(heard) ** 30) ** (1 / 30)
    return low_pass(mix)


dry = scene()
out = record(dry)
generate_wav(out)
```